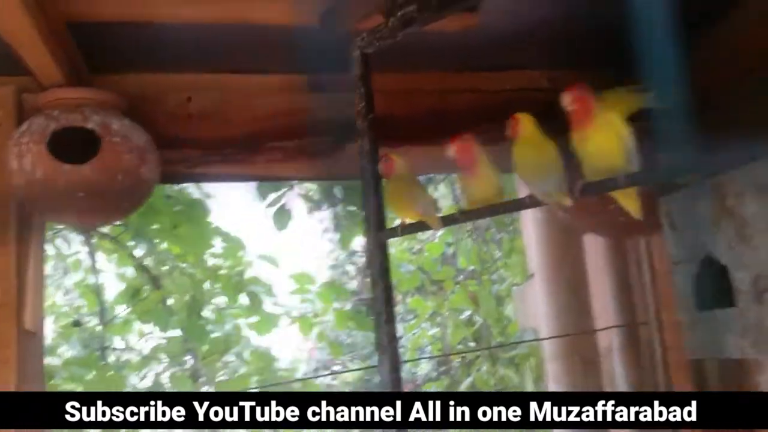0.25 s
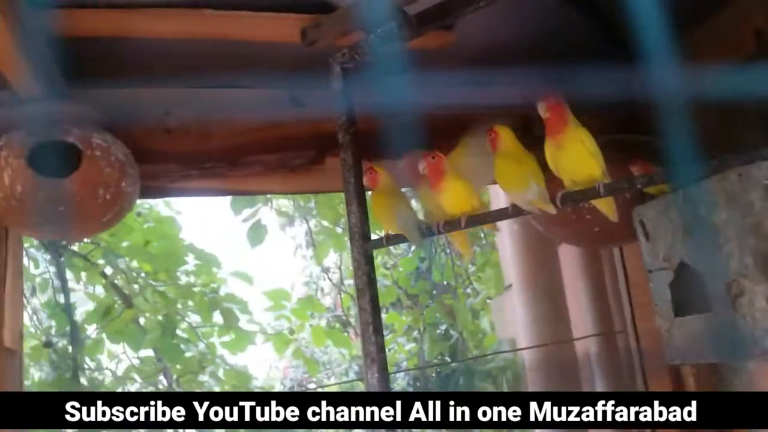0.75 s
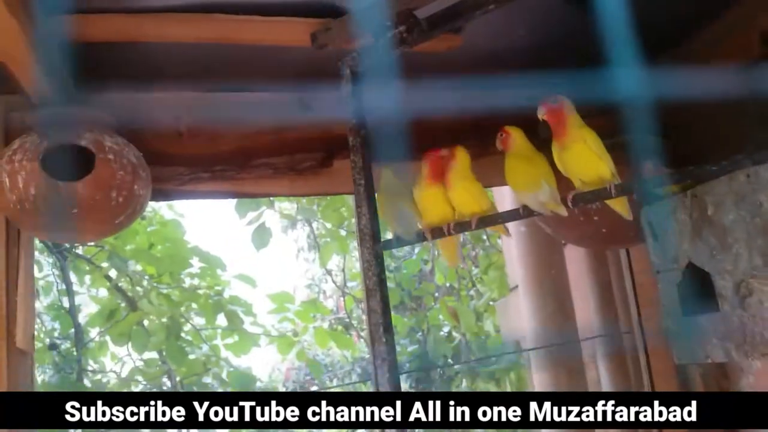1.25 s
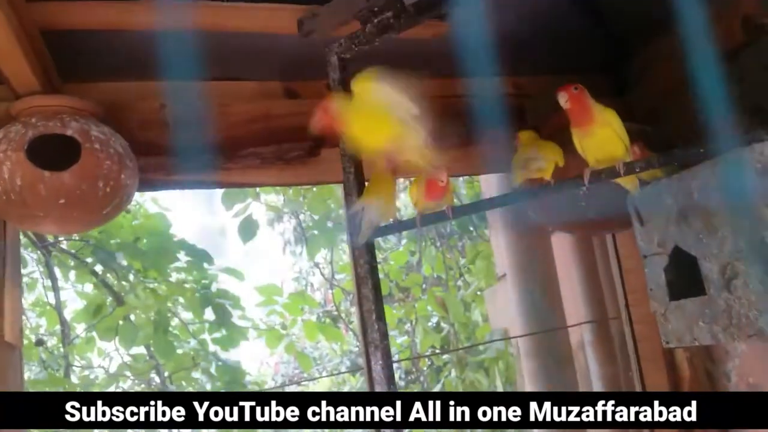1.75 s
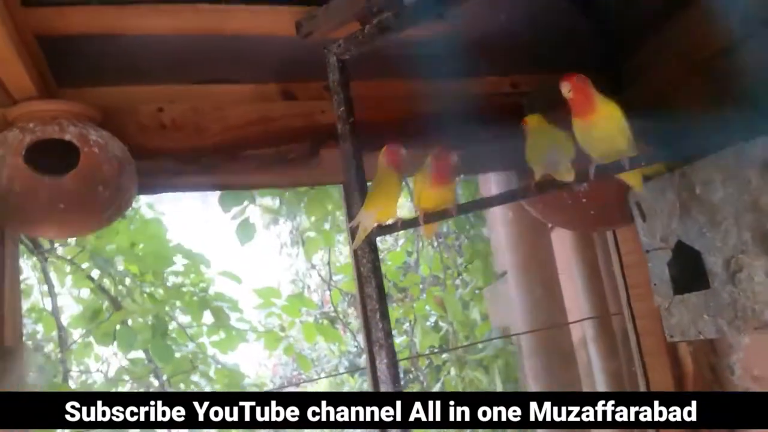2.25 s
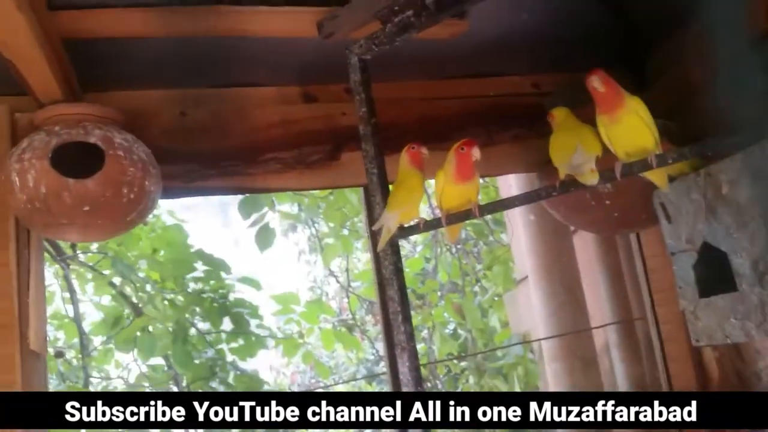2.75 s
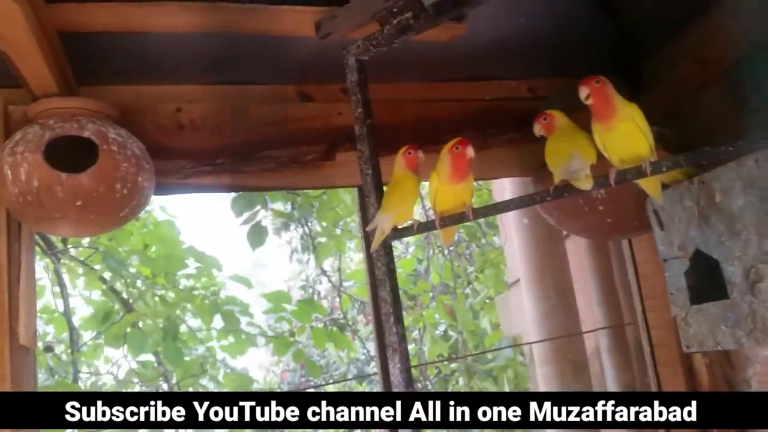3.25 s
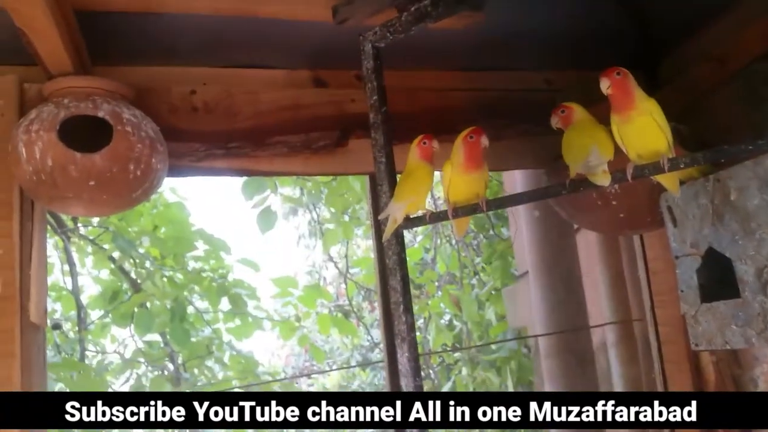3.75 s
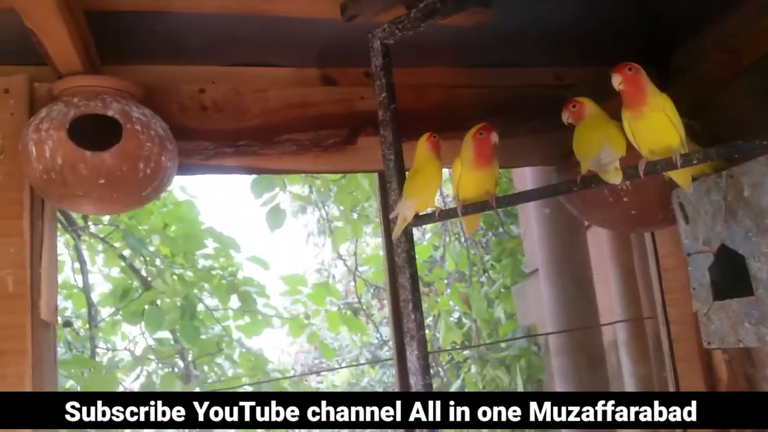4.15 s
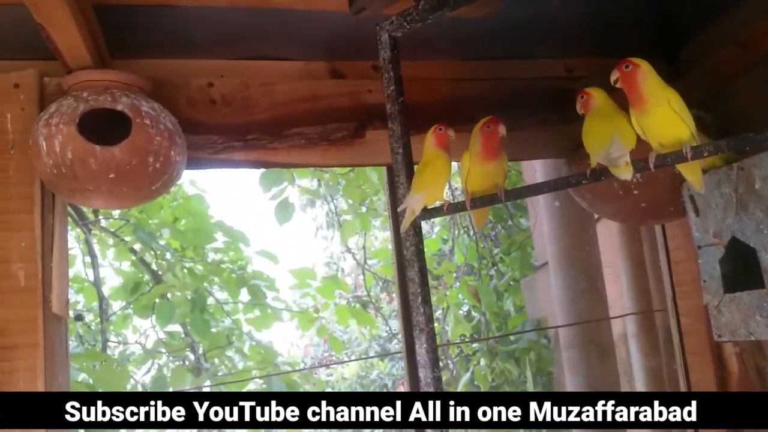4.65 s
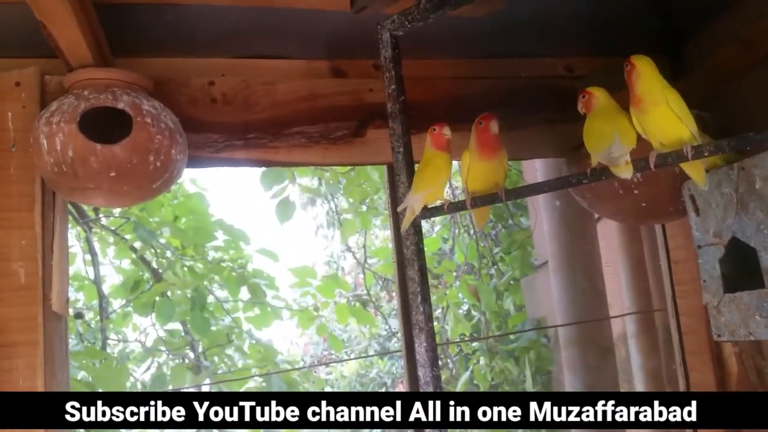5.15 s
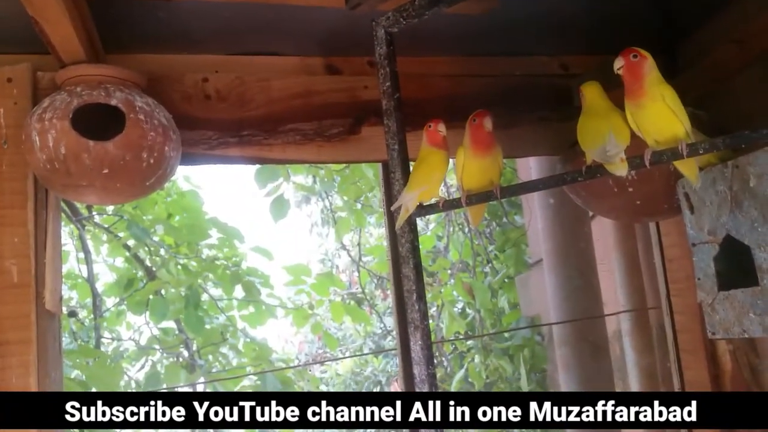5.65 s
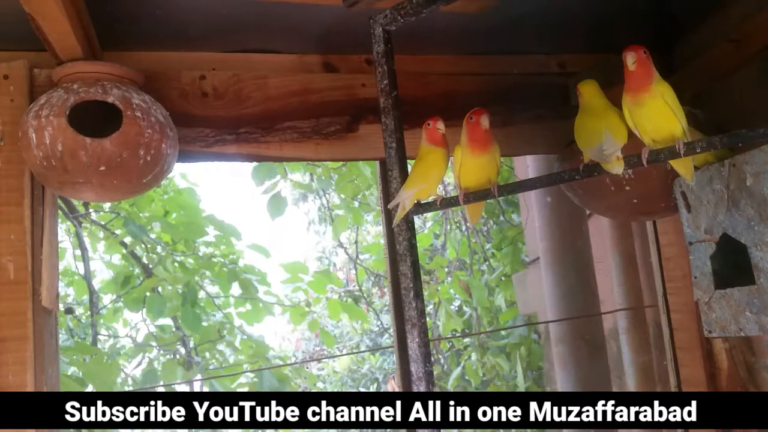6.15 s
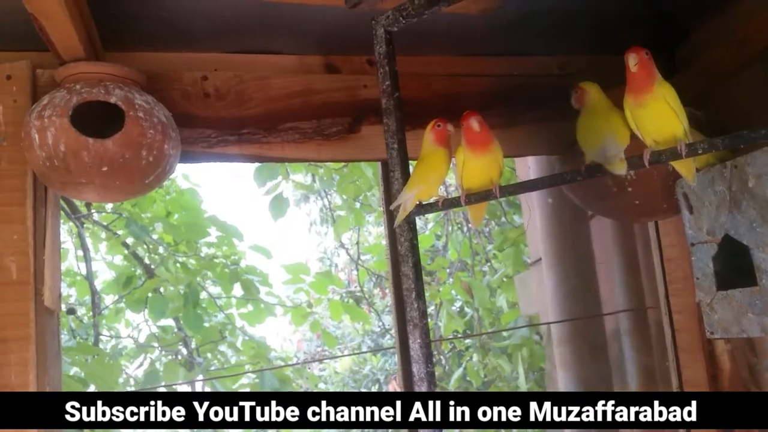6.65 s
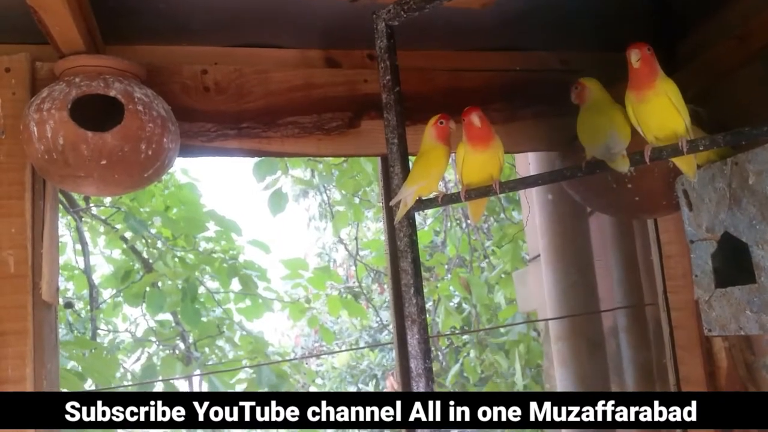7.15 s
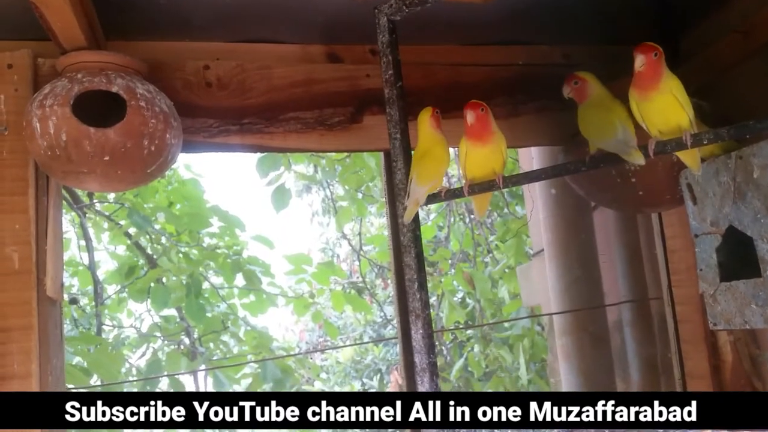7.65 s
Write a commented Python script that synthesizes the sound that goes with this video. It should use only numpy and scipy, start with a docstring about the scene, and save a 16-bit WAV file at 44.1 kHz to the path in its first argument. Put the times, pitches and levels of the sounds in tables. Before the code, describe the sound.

Small parrots in a wooden aviary, heard on a hand-held phone. Very short rough squawks, each flicking up into a shrill whistle, come singly at uneven gaps. Soft wing stirs and dull finger bumps follow, with a faint far bird. Then two birds chatter in a quickening, overlapping run before it slows and stops, leaving two isolated squawks over faint insect hiss.

```python
"""In a wooden aviary, small parrots call from a perch, heard through a hand-held phone.
Squawks step between two rough notes and break up into a shrill whistle; later two birds chatter in
overlapping runs. The bird voices are sums of wavering overtones, and the walls ring briefly after them.
Shaped noise makes insects hissing to the left, the rumble and rustle of air stirred by wings and hands,
and fingers bumping the case. Near sines make a faint lead-in to one squawk and a far bird's song."""
import sys
import numpy as np
from scipy import signal
from scipy.fft import rfft, irfft, next_fast_len
from scipy.io import wavfile
from scipy.ndimage import uniform_filter1d

SR = 44100
rng = np.random.default_rng(int(sys.argv[2]) if len(sys.argv) > 2 else 0)


def waveform_to_disk(signal):
    """Save audio, clipped to [-1, 1], as 16-bit WAV at the path in sys.argv[1]."""
    frames = np.transpose(np.atleast_2d(signal))
    scaled = np.clip(frames, -1, 1) * 32767
    samples = np.round(scaled).astype(np.int16)
    wavfile.write(sys.argv[1], SR, samples)


N = 348831

CLEAR, HARSH = .52, .95  # roughness of a squawk
LEFT_RIGHT = np.array([[1], [-1]])  # times a dB value: raises the left, lowers the right


def undb(db):
    """Turn decibels into a gain factor."""
    return 10 ** (np.asarray(db) / 20)


def shape(table, hz):
    """Read a table of (Hz, dB) at any pitch, with straight lines on a log-frequency axis."""
    table_hz, table_db = np.transpose(table)
    return np.interp(np.log(np.maximum(hz, 1)), np.log(table_hz), table_db)


def colour(x, gain_db):
    """Filter a sound by a function that gives the dB for each Hz."""
    size = next_fast_len(N)
    spectrum = rfft(x, size)
    gain = undb(gain_db(np.fft.rfftfreq(size, 1 / SR)))
    return irfft(spectrum * gain, size)[..., :N]


def walk(rate_hz, size=None):
    """Wander smoothly between random values, drawn rate_hz times a second; the spread is near 1."""
    size = size or N
    hold = max(int(SR / rate_hz), 1)
    steps = np.repeat(rng.standard_normal(size // hold + 1), hold)
    smooth = uniform_filter1d(uniform_filter1d(steps, hold), hold)
    return 1.07 * smooth[:size]


def noise(table, alike):
    """Make stereo noise of rms 1 with a given spectrum; alike is how well left and right match (0-1)."""
    mid, side = rng.standard_normal((2, N))
    alike = np.clip(alike, 0, 1)
    stereo = np.sqrt(1 + alike) * mid + np.sqrt(1 - alike) * side * LEFT_RIGHT

    def spectrum_db(hz):
        """Follow the table and drop 80 dB beyond its ends."""
        beyond = (hz < table[0][0]) | (hz > table[-1][0])
        return shape(table, hz) - 80 * beyond

    x = colour(stereo, spectrum_db)
    return x / x.std()


def air():
    """Moving air as noise that swells with wings and hands, plus insect noise and a faint high hiss."""
    # stirs by wings and hands: each swell rises to its peak and falls again
    # columns: peak_s, length_s, rumble_rise_db, rustle_rise_db
    stirs = [(0.673, 0.11, 11, 5.5), (1.7, 0.076, 15, 6.5), (1.933, 0.048, 16, 2.5),
             (2.185, 0.062, 15.5, 5), (2.45, 0.19, 10.5, 3), (2.889, 0.036, 4, 6.5), (3.042, 0.16, 12, 6),
             (3.194, 0.031, 7, 8), (3.472, 0.11, 11, 16), (4.1, 0.391, 9.5, 1)]
    # spectra of the four noises, columns: frequency_hz, relative_level_db (per Hz)
    rumble_spectrum = [(20, -11), (70, -4.5), (160, -14.5)]
    rustle_spectrum = [(80, -4), (200, -0.5), (450, -9.5), (1380, -18), (2600, -29.5)]
    insect_spectrum = [(2600, -24), (3250, -9.5), (3560, -4.5), (4440, -14.5), (4970, -24.5), (6000, -67.5)]
    hiss_spectrum = [(8500, -46), (10500, -23), (13500, -13.5), (15400, -7.5)]

    peak_s, length_s, rumble_rise_db, rustle_rise_db = np.transpose(stirs)
    seconds = np.arange(N) / SR
    swell = np.exp(-((seconds - peak_s[:, None]) / length_s[:, None]) ** 2)
    # each level: calm level + stirring + random wander + left/right balance, all in dB
    rumble_db = -53 + rumble_rise_db @ swell + 3.4 * walk(8.9) + 2.8 * LEFT_RIGHT
    rustle_db = -45.5 + rustle_rise_db @ swell + 1.3 * walk(18) + 2.55 * LEFT_RIGHT
    insects_db = -57 + 1.1 * walk(2.9) + 9.1 * LEFT_RIGHT
    hiss_db = -74 + 3.6 * LEFT_RIGHT
    rumble = noise(rumble_spectrum, alike=.7) * undb(rumble_db)
    rustle = noise(rustle_spectrum, alike=.36) * undb(rustle_db)
    insects = noise(insect_spectrum, alike=0) * undb(insects_db)
    hiss = noise(hiss_spectrum, alike=0) * undb(hiss_db)
    return rumble + rustle + insects + hiss


def lead_in_and_far_bird():
    """A faint squawk lead-in and a far bird's song: gliding near sines of unsteady pitch and level."""
    # one list per glide: first a faint rising lead-in just before the squawk at 3.79 s, then the far
    # bird; columns: time_s, pitch_hz, level_db (before the wander and the aviary)
    glides = [
        [(3.74, 2050, -62), (3.77, 2300, -56), (3.795, 2650, -54)],
        [(4.01, 1750, -53), (4.05, 1600, -52), (4.09, 1510, -54), (4.11, 1800, -52), (4.17, 1840, -48),
         (4.2, 1675, -49), (4.24, 1660, -60)],
        [(4.28, 1365, -54), (4.33, 1250, -56), (4.4, 1250, -62)],
    ]
    out = np.zeros(N)
    for glide in glides:
        time_s, pitch_hz, level_db = np.transpose(glide)
        t = np.arange(int(time_s[0] * SR), int(time_s[-1] * SR))
        waver = 1 + .015 * walk(150, size=len(t))
        pitch = np.interp(t / SR, time_s, pitch_hz) * waver
        level = np.interp(t / SR, time_s, level_db) + 4.5 * walk(90, size=len(t))
        out[t] = undb(level) * np.sin(2 * np.pi * np.cumsum(pitch) / SR)
    return out


def bumps():
    """Fingers on the case: dull knocks of fast-fading noise, close to the left microphone port."""
    # knocks, columns: start_s, level_db (before the dull colour and the left/right balance)
    knocks = [(2.889, -21.5), (3.027, -24.5), (3.149, -26.5), (3.336, -27.5), (3.666, -32), (4.053, -28),
              (4.389, -32.5), (4.52, -30.5), (4.597, -30.5), (6.478, -38), (7.437, -35)]
    out = np.zeros(N)
    t = np.arange(int(.08 * SR)) / SR
    fade = undb(-60 * t / .07)  # falls 60 dB in 0.07 s
    for start_s, level_db in knocks:
        i = int(start_s * SR)
        out[i:i + len(t)] += undb(level_db) * rng.standard_normal(len(t)) * fade
    dull = [(60, 12), (300, 18.5), (700, 3.5), (2500, -9.5), (5000, -48.0)]  # (Hz, dB)
    out = colour(out, lambda hz: shape(dull, hz))
    return out * undb([[3], [-11]])  # left, right


def aviary(dry):
    """Direct sound, a little later at the right port, then a short dense wall ring and a faint long one."""
    # what the walls return, columns: frequency_hz, gain_db
    walls = [(2200, 4), (4800, 2), (6300, 0), (12000, 1)]
    # how the two ports hear the birds, columns: frequency_hz, left_minus_right_db
    ports = [(1300, 8), (2400, 11.5), (4400, 1.5), (8000, 5.5), (15000, 6)]
    port_lag_s, shadow_db = .0003, -7  # the case delays and shades the direct sound at the right port
    rings = (.13, -3.5), (.7, -28)  # (seconds to fall 60 dB, level in dB before the wall colour)

    t = np.arange(SR) / SR
    echo = 0
    for fall_s, level_db in rings:
        tail = rng.standard_normal((2, SR)) * undb(-60 * t / fall_s) * np.clip(t / .002, 0, 1)
        echo = echo + undb(level_db) * tail / np.sqrt(np.sum(tail ** 2, axis=1, keepdims=True))
    echo = colour(echo, lambda hz: shape(walls, hz))[:, :SR]
    # the direct sound
    echo[0, 0] += 1
    echo[1, int(port_lag_s * SR)] += undb(shadow_db)
    wet = signal.fftconvolve(dry[None], echo, axes=1)[:, :N]
    low_cut = signal.butter(4, 1150, "high", fs=SR, output="sos")
    wet = signal.sosfilt(low_cut, wet)
    return colour(wet, lambda hz: shape(ports, hz) * np.array([[1], [0]]))


def add_syllable(out, times_s, pitch_hz, level_db, rough, slope_db, first_db=0.):
    """Add one syllable: the voice organ's pulses as up to eight wavering, throbbing, rasping overtones.

    slope_db is the change per overtone, first_db the extra level of the lowest one.
    """
    # tone colour of the calls as heard: strong low, weak around 7-8 kHz, brighter again at 11-14 kHz columns:
    # frequency_hz, gain_db
    tone_colour = [(1500, 10), (2300, -0.5), (4200, 0.5), (5300, -7), (6400, -11.5), (7200, -19.5),
                   (8400, -20.5), (9500, -15.5), (11000, -7.5), (13500, -4), (15500, -8)]
    t = np.arange(max(int(times_s[0] * SR), 0), min(int(times_s[-1] * SR), N))
    size = len(t)
    plain_hz = np.interp(t / SR, times_s, pitch_hz)
    effort_db = np.interp(t / SR, times_s, level_db)
    waver = 1 + rough * (.022 * walk(260, size=size) + .04 * walk(2500, size=size))
    hz = plain_hz * waver
    phase = 2 * np.pi * np.cumsum(hz) / SR
    k = np.arange(1, 9)[:, None]  # overtone numbers; 1 is the fundamental

    slope = slope_db - .24 * (np.max(level_db) - effort_db)  # less effort, weaker overtones
    strength_db = shape(tone_colour, k * plain_hz) + slope * k + first_db * (k == 1)
    strength = undb(strength_db) * (k * hz < .45 * SR)  # leave out what is too high to play
    strength /= np.sqrt(np.sum(strength ** 2, axis=0))

    # each overtone throbs slowly and rasps fast, which fills the gaps between the overtones
    unrest = [.5 * walk(200, size=size) + .45 * walk(1800, size=size) for _ in k]
    throb = undb(min(rough, 1) * 9 * np.tanh(unrest))
    fade = np.clip(np.minimum(t - t[0], t[-1] - t) / (.0012 * SR), 0, 1)
    out[t] += fade * undb(effort_db) * np.sum(strength * throb * np.sin(k * phase), axis=0)


def chatter():
    """Two chattering birds: a faint low pip, a jump to a held note, a flip up and a lower last note."""
    # syllables, columns: flip_s (time of the upward flip), level_db (before shaping), held_hz,
    # flip_hz, last_hz
    syllables = [(4.650, -20.5, 4296, 6670, 6480), (4.749, -21, 3830, 6460, 4930),
                 (4.851, -20, 3726, 6350, 4680), (4.96, -22, 3620, 6530, 4650),
                 (5.072, -21, 3600, 4410, 4785), (5.145, -18, 4250, 6150, 5070),
                 (5.183, -17, 3950, 5030, 4620), (5.252, -16, 3920, 6400, 4870),
                 (5.307, -17.5, 3874, 5020, 4540), (5.357, -16.5, 3960, 6270, 4800),
                 (5.432, -15, 4120, 5100, 4750), (5.469, -17.5, 4030, 6220, 4800),
                 (5.544, -17.5, 3670, 4900, 4350), (5.58, -17, 4210, 6270, 4660),
                 (5.665, -18, 3990, 4880, 4710), (5.691, -18.5, 3863, 6220, 4570),
                 (5.784, -18.5, 3890, 4880, 4370), (5.81, -18, 3807, 6240, 4320),
                 (5.904, -19, 4000, 4900, 4510), (5.928, -18.5, 3840, 6210, 4586),
                 (6.052, -17.5, 3830, 6150, 4540), (6.176, -19, 3775, 6150, 4550),
                 (6.303, -18, 3825, 6100, 4500), (6.436, -20.5, 3816, 5980, 4440)]
    pip_s, jump_s, held_s, flip_s, last_s = .0075, .003, .018, .011, .025  # lengths of the parts
    pip_from, pip_to, held_climb = .45, .64, .085  # shares of the held note's pitch
    pip_db, held_db, swell_db = -25, -9, 8  # pip, start of the held note, its swell

    high, low = np.zeros((2, N))
    # times are counted from the flip
    lead = np.array([-jump_s - held_s, -held_s, 0]) - .001
    pip_times = lead[0] - pip_s * np.array([1, .5, 0])
    flip = .002 + np.array([-.0015, 0, flip_s - .002, flip_s, flip_s + .002, flip_s + last_s])
    times = np.r_[lead, flip]
    lead_share = np.array([pip_to, 1 - held_climb / 2, 1 + held_climb / 2])
    pip_share = np.array([pip_from, pip_to, pip_to])
    # the voice nearly breaks off while it jumps between notes
    effort_db = np.r_[pip_db - 2, held_db, held_db + swell_db, -10, 0, -1.5, -11, -2, -12]
    for s, level_db, held_hz, flip_hz, last_hz in syllables:
        pitch = np.r_[lead_share * held_hz, (held_hz + flip_hz) / 2, flip_hz, flip_hz,
                      (flip_hz + last_hz) / 2, last_hz, last_hz]
        bird = high if flip_hz > 5700 else low  # the two birds are told apart by their flip
        add_syllable(bird, s + pip_times, held_hz * pip_share, level_db + pip_db + np.array([-7, 0, -2]),
                     rough=1.4, slope_db=-11)
        add_syllable(bird, s + times, pitch, level_db + effort_db, rough=.42, slope_db=-1.5)
    return high, low


def squawker():
    """The squawking voice glides into one note, steps to a second, then breaks up into a whistle."""
    # squawks, columns: start_s, first_note_s (end of the first note, from the start), whole_s (length
    # up to the whistle), open_hz, first_hz, second_hz, level_db (before shaping), first_db (boost of
    # the fundamental), roughness (CLEAR or HARSH), whistle_hz, whistle_db (before shaping)
    squawks = [(-.05, .03, .053, 2300, 2300, 2310, -25.5, -22, CLEAR, 5250, -31),
               (0.065, 0.018, 0.054, 1720, 2336, 2346, -26, -20.5, HARSH, 5164, -22.5),
               (0.22, 0.027, 0.069, 2780, 2580, 2126, -23.5, -16.5, CLEAR, 5230, -22),
               (0.61, 0.023, 0.059, 1790, 2180, 2118, -29, -8, CLEAR, 4790, -28),
               (0.788, 0.031, 0.061, 2870, 2713, 2284, -23, -13.5, CLEAR, 5080, -23),
               (0.955, 0.028, 0.075, 1795, 2480, 2142, -26, -15, HARSH, 5310, -23.5),
               (1.27, 0.027, 0.071, 2390, 2550, 2168, -26, -16, CLEAR, 5480, -28),
               (1.639, 0.026, 0.06, 1616, 2205, 2260, -24, -11, CLEAR, 5100, -26.5),
               (1.89, 0.036, 0.072, 2597, 2356, 2233, -26.5, -16, HARSH, 5150, -26.5),
               (2.108, 0.016, 0.073, 2790, 2644, 2350, -25.5, -20, HARSH, 5290, -24.5),
               (2.311, 0.026, 0.07, 2680, 2640, 2390, -28, -15, HARSH, 5250, -24),
               (2.483, 0.0072, 0.025, 2540, 2577, 2627, -29, -8.5, CLEAR, 4877, -21.5),
               (2.605, 0.0041, 0.016, 3380, 4120, 2760, -26.5, -6.5, HARSH, 4714, -21),
               (3.336, 0.0325, 0.055, 1760, 2188, 2165, -25.5, -15, CLEAR, 5275, -25.5),
               (3.496, 0.026, 0.067, 1800, 2140, 2358, -27, -13, CLEAR, 5254, -22.5),
               (3.789, 0.015, 0.065, 1710, 2213, 2185, -25.5, -9, CLEAR, 5337, -22),
               (4.473, 0.031, 0.067, 1900, 2187, 2340, -30, -13, CLEAR, 5290, -25),
               (4.57, 0.043, 0.059, 2245, 2255, 2116, -26, -18.5, HARSH, 5330, -25),
               (6.974, 0.026, 0.051, 1750, 2095, 1914, -30.5, -16, CLEAR, 5214, -28),
               (7.77, 0.025, 0.066, 1744, 2183, 2370, -31.5, -13, CLEAR, 5247, -27)]
    open_s, step_s, crack_s, whistle_s = .008, .0095, .0025, .027  # glide in, step, crack, whistle
    climb = .06  # share of its pitch by which a note drifts
    out = np.zeros(N)
    for (s, first_s, whole_s, open_hz, first_hz, second_hz, level_db, first_db, rough,
         whistle_hz, whistle_db) in squawks:
        # the two notes
        stepped_s = min(first_s + step_s, whole_s - .002)
        times = s + np.array([0, min(open_s, .7 * first_s), first_s, (first_s + stepped_s) / 2,
                              stepped_s, whole_s])
        drift = climb * np.sign(first_hz - open_hz)  # the first note keeps drifting the way it came in
        pitch = [open_hz, first_hz * (1 - drift / 2), first_hz * (1 + drift / 2),
                 (first_hz + second_hz) / 2, second_hz * (1 - climb / 2), second_hz * (1 + climb / 2)]
        # a wider rise into the first note opens more softly
        open_db = -17 - 3 * max(np.log2(first_hz / open_hz), 0)
        # the voice thins while it steps, more for a wider step
        break_db = -3 - 5 * min(abs(np.log2(first_hz / second_hz)) / .15, 1)
        effort_db = np.array([open_db, -6, -3, break_db, -.5, 0])
        add_syllable(out, times, pitch, level_db + effort_db, rough, slope_db=-1.14, first_db=first_db)

        # in harsh squawks the first note sounds on beside the second
        if rough == HARSH:
            add_syllable(out, times[[2, 4, 5]], np.full(3, pitch[2]), level_db - 6 + np.array([-6, 0, 0]),
                         rough, slope_db=1.0, first_db=first_db / 2)

        # a short rasp where the squawk breaks into the whistle
        end_s = s + whole_s
        crack_times = end_s + crack_s * np.array([-1, 0, 1.5])
        crack_db = whistle_db - 10 + np.array([-6, 0, -12])
        add_syllable(out, crack_times, second_hz * np.array([1, 1.2, 1.4]), crack_db,
                     rough=2.5, slope_db=-2, first_db=-14)

        # the whistle bends up out of the second note's octave, then sags
        bend = np.array([min(2 * second_hz / whistle_hz, 1), 1.025, .985, .965])
        whistle_times = end_s + whistle_s * np.array([-.1, .2, .85, 1])
        add_syllable(out, whistle_times, whistle_hz * bend, whistle_db + np.array([-9.5, 4.0, 3.0, -6]),
                     rough=.37, slope_db=-5.0)
    return out


def scene():
    """Sum the air, the bumps and the bird calls, each layer of calls with its own ring of the aviary."""
    calls = lead_in_and_far_bird(), *chatter(), squawker()
    return air() + bumps() + sum(aviary(call) for call in calls)


def record(dry):
    """The phone cuts the top: a steep low-pass at 15850 Hz."""
    top_cut = signal.ellip(10, .2, 80, 15850, fs=SR, output="sos")
    return signal.sosfilt(top_cut, dry)


dry = scene()
out = record(dry)
waveform_to_disk(out)
```